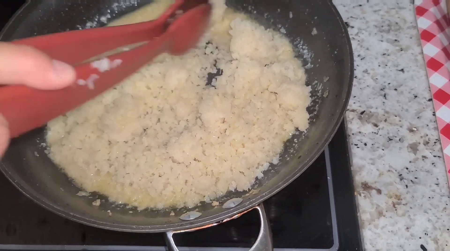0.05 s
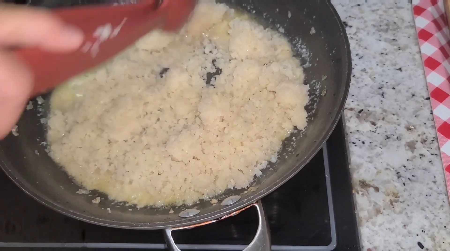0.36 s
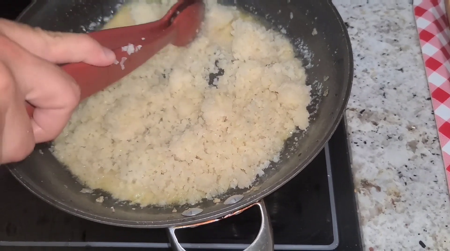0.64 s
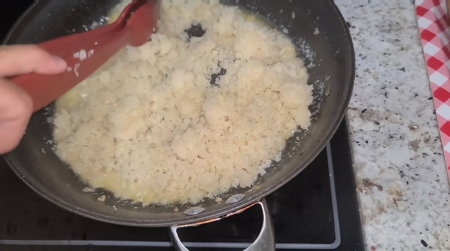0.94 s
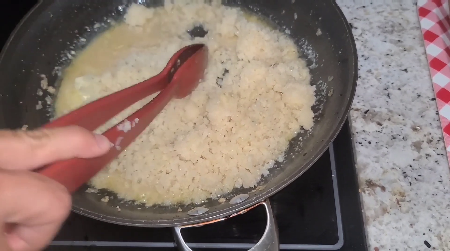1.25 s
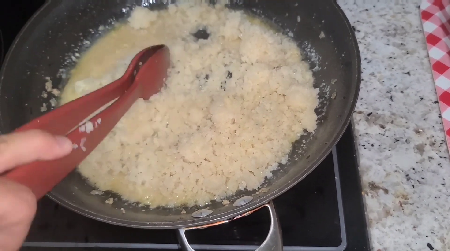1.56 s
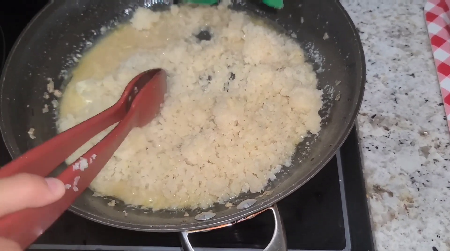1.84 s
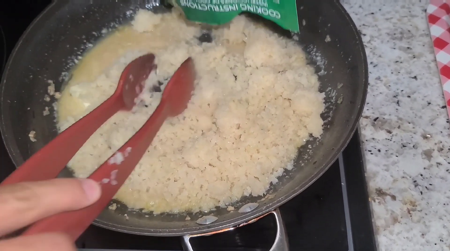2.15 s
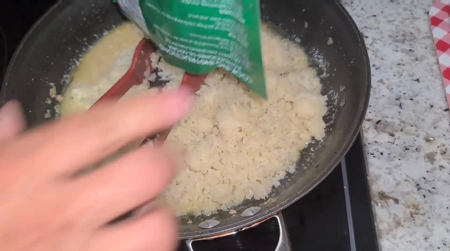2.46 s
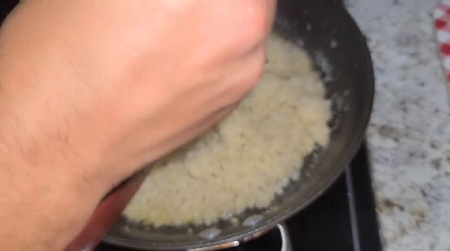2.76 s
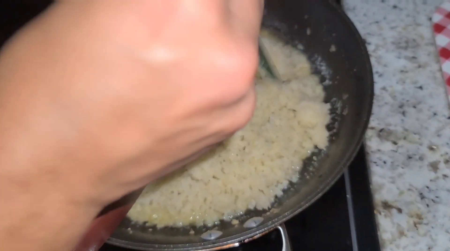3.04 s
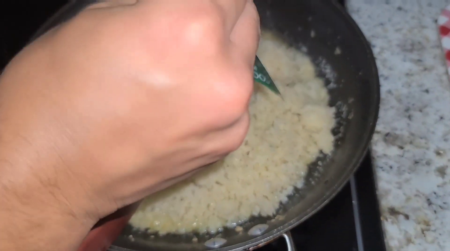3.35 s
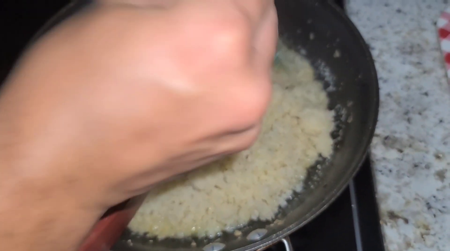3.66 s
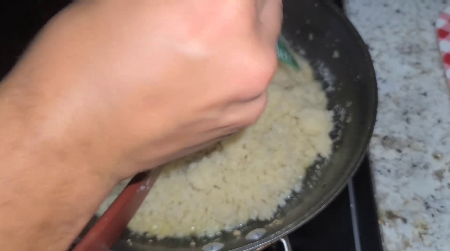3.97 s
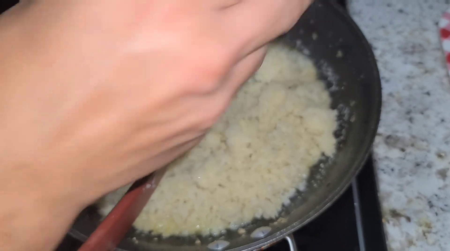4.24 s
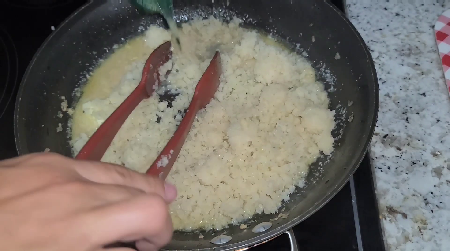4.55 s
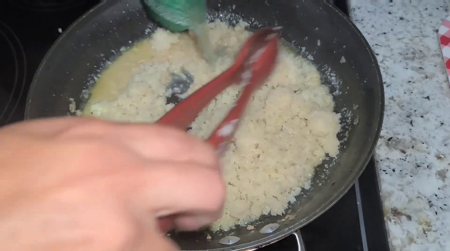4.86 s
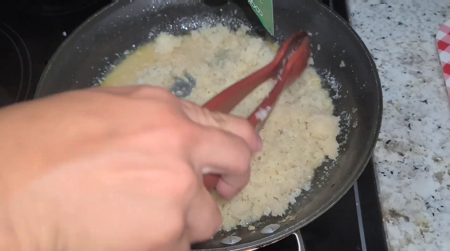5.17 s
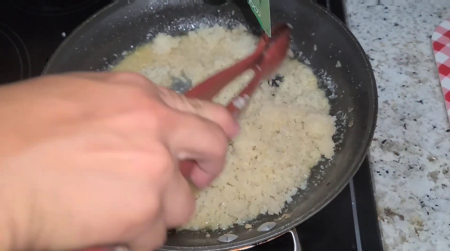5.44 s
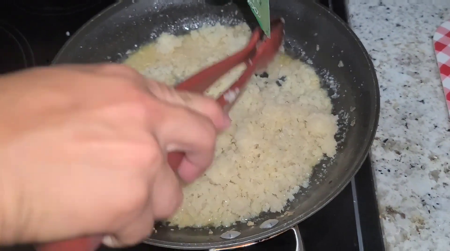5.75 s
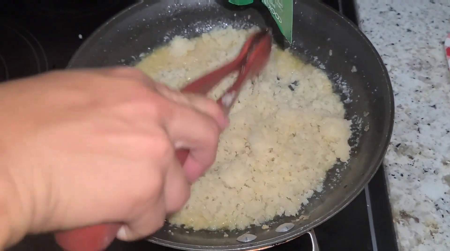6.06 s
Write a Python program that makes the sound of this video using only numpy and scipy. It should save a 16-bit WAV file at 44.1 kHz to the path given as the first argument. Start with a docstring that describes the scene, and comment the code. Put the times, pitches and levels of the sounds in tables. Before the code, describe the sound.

In a small kitchen, a close microphone catches several firm clacks and short metallic scrapes of tongs stirring rice in a frying pan. After lighter ticks comes a quick, muffled double knock on the pan. A shaken plastic pouch then crackles for about a second and a half before the tongs resume more gently. A low hum runs throughout, with a barely audible sizzle swelling now and then.

```python
"""You hear tongs scraping and clacking as they work rice in a nonstick pan on a kitchen hob.
Each squeeze rubs the steel arms together, and the firm ones end with the tips clacking shut.
The tongs knock the pan twice, then a plastic pouch crinkles as more rice is shaken out.
A faint, fizzing hiss swells now and then, and steam gives one thin whistle.
A small room echoes around it all, over a low hum."""
import sys
import numpy as np
from scipy import signal
from scipy.fft import rfft, irfft
from scipy.io import wavfile
from scipy.ndimage import uniform_filter1d

SR = 44100
rng = np.random.default_rng(int(sys.argv[2]) if len(sys.argv) > 2 else 0)


def unload_audio(sound):
    """Save the sound as a 16-bit wav file, at the path given as the first command line argument."""
    columns = np.transpose(np.atleast_2d(sound))
    # keep every value between -1 and 1, then stretch to whole-number steps
    steps = np.round(np.clip(columns, -1, 1) * 32767)
    wavfile.write(sys.argv[1], SR, steps.astype(np.int16))


N = 269451
LEAD = 4410  # extra samples before time zero, so the sound is already under way
TIME = np.arange(-LEAD, N) / SR  # seconds along the whole scene
AGE = np.arange(SR // 2) / SR  # seconds since one short sound began

# The tips meeting. Each row: start in seconds, level in dB, pitch factor,
# crack in dB compared with the tips' ring, pan thump in dB.
CLACKS = [(-.03, -16, 0.81, 3.5, -37), (0.2606, -8, 0.98, -8.5, -30.5), (.634, -7.5, 1.14, -3.5, -26),
          (0.6374, -8.5, 0.97, -1, -49), (1.0261, -4, 1.06, -17, -33), (1.186, -37, 1.3, -9, -63),
          (1.218, -38, 1.67, -6, -52), (1.82, -34.5, 1.09, -30, -55), (2.237, -33.5, 1, -7, -44),
          (4.459, -30.5, 0.96, -37, -43.5), (4.73, -37.5, 1.02, -2.5, -47), (5.351, -22.5, 1.06, -10, -35),
          (5.6668, -13.5, 1.09, -11.5, -34), (5.982, -27.5, 0.93, 2.5, -42)]
# The tones of the tips. Each row: pitch in Hz, level in dB, seconds to fade by 60 dB.
TIP_MODES = [(680, -11, 0.04), (860, -8, 0.015), (1132, 0.5, 0.022), (1634, 2, 0.017), (2490, -5.5, 0.0087),
             (2863, -9, 0.0092), (4720, -16.5, 0.01)]
# The tone colours of a clack's crack, its rattle, and the shudder of pan and hob.
# Each row: frequency in Hz, level in dB.
CRACK_COLOUR = [(200, -6), (1000, 3.5), (4000, -0.5), (7000, -10), (12000, -18.5), (16000, -36)]
RATTLE_COLOUR = [(200, -19.5), (750, -1), (1800, 8), (3200, 1), (6000, -28), (16000, -41)]
SHUDDER_COLOUR = [(30, -15), (90, 6.5), (200, -9), (400, -7.5), (600, -13), (1200, -18), (5000, -53.5)]
# Squeezes of the tongs. Each row: start in seconds, length in seconds, level at full grip in dB,
# swell up to that level in dB, arm ring in dB compared with the rubbing, arm pitch factor.
SQUEEZES = [(0.226, 0.024, -43, 16.5, -8.5, 1.14), (0.557, 0.081, -35.5, 18.5, -3, 0.97),
            (0.9812, 0.055, -52.5, -1.5, 2.5, 1.02), (1.288, 0.043, -41.5, 9, -10, 1.15),
            (1.6, 0.033, -44.5, 3.5, -7.5, 0.99), (1.871, 0.028, -44, 3, -0.5, 0.96),
            (2.075, 0.028, -48, 0, -9, 1), (5.048, 0.059, -51, 5.5, -8, 1.3),
            (5.303, 0.043, -35.5, 21.5, -18, 1.25), (5.601, 0.065, -37, 25, -9.5, 1.1),
            (5.921, 0.056, -40.5, 17.5, -1.5, 1.08)]
# The tone colour of steel rubbing on steel. Each row: frequency in Hz, level in dB.
RUB_COLOUR = [(400, -44), (1200, 1), (2500, 0), (4500, 5.5), (6000, -2.5), (9000, 3.5), (10500, -2.5),
              (13000, 0), (16000, -17)]
# The tones of the steel arms. Each row: pitch in Hz, level in dB, seconds to fade by 60 dB.
ARM_MODES = [(2510, 2, 0.034), (2816, 1.5, 0.011), (3450, -9, 0.008), (4720, -5.5, 0.019)]
# The tongs hitting the pan. Each row: start in seconds, peak in dB, contact time in seconds.
KNOCKS = [(2.3373, -15, 0.00048), (2.3796, -13, 0.00032)]
# The tones of the pan. Each row: pitch in Hz, level in dB, seconds to fade by 60 dB.
PAN_MODES = [(95, -12, 0.13), (155, -10, 0.13), (218.5, -15, 0.126), (292, -17, 0.067), (512, -5.5, 0.069),
             (731, -8.5, 0.079), (1045, -6, 0.04), (1450, -8.5, 0.073), (1562, -9.5, 0.043),
             (2010, -27.5, 0.28), (2670, -35.5, 0.51), (8270, -27, 0.074)]
# Bends of the pouch. Each row: start in seconds, hold in seconds, level in dB.
FLEXES = [(2.758, 0.019, -29), (2.8, 0.026, -37), (2.865, 0.049, -49), (3.1, 0.057, -45),
          (3.215, 0.0065, -33.5), (3.25, 0.077, -48), (3.313, 0.11, -34), (3.532, 0.042, -34),
          (3.588, 0.059, -36.5), (3.652, 0.16, -31.5), (3.83, 0.085, -33.5), (3.991, 0.0084, -32),
          (4.037, 0.069, -38.5), (4.13, 0.011, -36.5), (4.197, 0.016, -40), (4.66, 0.058, -52.5)]
# Big creases buckling. Each row: start in seconds, peak in dB, sharp edge in dB compared with the body.
SNAPS = [(2.763, -26.5, -0.5), (2.7933, -22, 10), (2.7979, -21, 6), (2.8476, -18.5, -11.5),
         (2.876, -28, -15), (3.016, -29, 6), (3.05, -28, -11), (3.1048, -19.5, -6), (3.378, -9, 6.5),
         (3.404, -22, -3), (3.481, -22, -27), (3.511, -24, -22), (3.59, -31.5, 3), (3.634, -20.5, -10),
         (3.6443, -19.5, 3.5), (3.678, -27, -3), (3.7229, -8, -26), (3.7277, -17, 0), (3.741, -19, -20),
         (3.772, -24, 2.5), (3.8085, -11.5, -42), (3.8119, -17.5, -8.5), (3.829, -22, -12),
         (3.848, -17, 7.5), (3.874, -18.5, -8), (3.892, -17.5, -8.5), (3.967, -28, -21),
         (4.004, -24.5, -15), (4.099, -25, -21), (4.133, -31, -23), (4.249, -31, -20), (4.261, -30.5, -12),
         (4.5256, -31.5, 3)]
# The tone colours of the pouch's body and a crease's sharp edge. Each row: frequency in Hz, level in dB.
POUCH_COLOUR = [(60, -14), (150, -11), (300, -3.5), (450, -7), (640, 4.5), (900, -1.5), (1300, 4.5),
                (1650, 2), (2200, -8), (3200, -10), (4500, -26.5), (6200, -47.5), (9000, -75), (16000, -52)]
EDGE_COLOUR = [(500, -2), (1500, 7.5), (3000, 13.5), (4600, 4), (6200, -7.5), (8800, -8.5), (11000, -21),
               (16000, -35.5)]
# Swells of a faint, fizzing hiss. Each row: start in seconds, hold in seconds, level in dB.
HISS_SWELLS = [(1.02, 0.4, -62), (1.66, .06, -72), (2.22, 0.014, -63), (4.15, 0.22, -63)]
# The resonances of the hiss. Each row: centre in Hz, width in octaves, level in dB.
FIZZ_BANDS = [(1380, 2, 0), (3340, 0.82, -6.5), (4650, 0.16, -3.5), (8750, 0.26, -9), (13000, 0.34, -14)]
# Steam escaping from the rice. Each row: start in seconds, hold in seconds, level in dB.
WHISTLES = [(1.245, 0.028, -52)]
# The tone colour of rumble, for both kitchen and shaken pouch. Each row: frequency in Hz, level in dB.
RUMBLE_COLOUR = [(25, -7), (60, -0.5), (130, -5.5), (250, -9), (500, -18), (1000, -27.5), (2500, -38.5),
                 (4800, -45.5), (6200, -57), (9000, -56), (16000, -54)]
# The rise and fall of the hum. Each row: time in seconds, level in dB.
HUM_LEVELS = [(0, -70), (1, -58), (2.5, -49.5), (4.5, -61.5), (6.1, -64)]
# The room's echo. Each row: frequency in Hz, level in dB, seconds to fade by 60 dB.
ROOM_BANDS = [(119.2, -6.5, 0.44), (500, -7, 0.33), (1200, -15.5, 0.33), (2610, -12, 0.45),
              (4930, -13.5, 0.22), (8820, -17.5, 0.62), (14040, -22, 0.26)]

THUMP_LEFT_HZ, THUMP_RIGHT_HZ = 86.2, 166  # the pan rocks at a different pitch on either side
CROSS_S = 4.9  # the tongs move over to the right side
THUMP_CYCLES = 38  # swings of the rocking pan until it is 60 dB down
SWELL_POWER = 2.1  # the grip tightens slowly at first, then fast
PITCH_RISE = 0.05  # the arms stiffen and ring higher as the grip tightens
CATCH_DB, CATCH_S = 6, 0.0052  # the arms break loose with a brief rasp, stronger if they ring freely


def clacks(rattle_db=-19, rattle_t60=0.16, shudder_db=2, shudder_t60=0.1, mode_scatter=0.025):
    """The padded tips shut with a dead clack, rattle briefly and rock the pan on the hob."""
    out = np.zeros(len(TIME))
    for start, db, pitch, crack_db, thump_db in CLACKS:
        # the grip and the rice between the tips shift each tone a little
        shifts = pitch * (1 + mode_scatter * rng.standard_normal(len(TIP_MODES)))
        modes = [(hz * shift, mode_db, t60) for (hz, mode_db, t60), shift in zip(TIP_MODES, shifts)]
        tips = peak_one(ring(modes))
        crack = undb(crack_db) * peak_one(colour(burst(t60=0.021), CRACK_COLOUR))
        rattle = undb(rattle_db) * peak_one(colour(burst(rattle_t60), RATTLE_COLOUR))
        thump_hz = THUMP_LEFT_HZ if start < CROSS_S else THUMP_RIGHT_HZ
        rocking = ring([(thump_hz, -3, THUMP_CYCLES / thump_hz)])
        shudder = undb(shudder_db) * peak_one(colour(burst(shudder_t60), SHUDDER_COLOUR))
        clack = undb(db) * (tips + crack + rattle) + undb(thump_db) * (rocking + shudder)
        add(out, start, echo(clack, wet_db=1.5))
    return out


def scrapes(attack_share=0.33, release_s=0.006, chatter_db=2.0, pitch_wander=0.03):
    """Steel slides on steel: the arms catch, then tiny slips hiss and make them ring."""
    out = np.zeros(len(TIME))
    rubbing = grains(rate=6000, spread_db=1.0) * undb(chatter_db * drift(rate=350))
    contact_point = drift(rate=70)
    for start, length, final_db, swell_db, ring_db, pitch in SQUEEZES:
        slips = np.roll(rubbing, -int(start * SR))[:len(AGE)]
        wander = np.roll(contact_point, -int(start * SR))[:len(AGE)]
        grip = np.minimum(AGE / length, 1) ** SWELL_POWER
        arms = through(slips, ring([(hz * pitch, db, t60) for hz, db, t60 in ARM_MODES]))
        speed = 1 + PITCH_RISE * grip + pitch_wander * wander  # a faster ring sounds higher
        arms = np.interp(np.cumsum(speed) / SR, AGE, arms, right=0)
        catch = undb(CATCH_DB + ring_db) * np.exp(-AGE / CATCH_S)
        rasp = unit(colour(slips, RUB_COLOUR)) + undb(ring_db) * (1 + catch) * unit(arms)
        pressure = undb(final_db - swell_db * (1 - grip))
        fade_in = np.minimum(AGE / (attack_share * length), 1)
        fade_out = np.exp(-np.maximum(AGE - length, 0) / release_s)
        add(out, start, echo(pressure * (fade_in * fade_out + catch) * rasp, wet_db=2.5))
    return out


def knocks(tips_db=-5):
    """The tongs bounce on the pan, whose ring is muffled by the food; a longer contact is duller."""
    out = np.zeros(len(TIME))
    for start, db, contact_s in KNOCKS:
        pan = peak_one(ring(PAN_MODES))
        tips = undb(tips_db) * peak_one(through(burst(t60=0.052), ring(TIP_MODES)))
        knock = through(pan + tips, fade(contact_s))
        add(out, start, undb(db) * peak_one(knock))
    return out


def pouch_rustle(body_db=-2.0, edge_db=-17.0, handling_db=-12.5, clump_db=5, tick_db=-4):
    """Small creases crackle and tick, brighter when folded hard, while the shaken pouch rumbles."""
    flex = gestures(FLEXES, attack_s=0.007, release_s=0.026)
    creases = unit(crackle(rate=300, spread_db=1.0))
    ticks = undb(tick_db) * unit(grains(rate=200, spread_db=0.5))
    clumps = (creases + ticks) * undb(clump_db * np.tanh(drift(rate=170)))
    body = undb(body_db) * unit(colour(clumps, POUCH_COLOUR))
    edge = undb(edge_db) * np.sqrt(peak_one(flex)) * unit(colour(clumps, EDGE_COLOUR))
    handling = undb(handling_db) * unit(colour(rng.standard_normal(len(TIME)), RUMBLE_COLOUR))
    return echo(flex * (body + edge + handling), wet_db=3.5)


def pouch_snaps(attack_s=0.00071, decay_s=0.0026, size_scatter=0.14):
    """Big creases give way within a few milliseconds, each snapping at its own pitch."""
    out = np.zeros(len(TIME))
    shape = (1 - np.exp(-AGE / attack_s)) * np.exp(-AGE / decay_s)
    for start, db, edge_db in SNAPS:
        buckle = rng.standard_normal(len(AGE)) * shape
        pitch = np.exp(size_scatter * rng.standard_normal())
        body = peak_one(colour(buckle, [(hz * pitch, band_db) for hz, band_db in POUCH_COLOUR]))
        edge = undb(edge_db) * peak_one(colour(buckle, EDGE_COLOUR))
        add(out, start, echo(undb(db) * peak_one(body + edge), wet_db=2.6))
    return out


def hiss(rest_db=-77, pop_db=-8, sputter_db=2.2):
    """Tiny clicks blur into a faint, fizzing hiss with lone pops; it swells now and then."""
    pops = undb(pop_db) * unit(grains(rate=22, spread_db=3.0))
    fizz = 0
    for hz, octaves, db in FIZZ_BANDS:
        sputter = unit(grains(rate=2500, spread_db=2.8)) * undb(sputter_db * drift(rate=40))
        fizz = fizz + undb(db) * band(sputter + pops, hz, octaves, order=2)
    swells = gestures(HISS_SWELLS, attack_s=0.084, release_s=0.44)
    return (undb(rest_db) + swells) * unit(fizz)


def whistle():
    """Steam squeezes through a narrow gap in the rice and sings at one breathy pitch."""
    return gestures(WHISTLES, attack_s=0.014, release_s=0.12) * wavering_tone(hz=2164, t60=0.012)


def kitchen(rumble_db=-49.5):
    """A steady low rumble with a wavering hum in it."""
    rumble = unit(colour(rng.standard_normal(len(TIME)), RUMBLE_COLOUR))
    hum_db = np.interp(TIME, *np.transpose(HUM_LEVELS))
    return undb(rumble_db) * rumble + undb(hum_db) * wavering_tone(hz=93, t60=0.33)


def echo(x, wet_db, build_s=0.0024):
    """A sound plus its echo off the hard walls of a small room, different for every spot."""
    log_hz = np.log(np.maximum(np.arange(len(AGE) // 2 + 1) * SR / len(AGE), 1))
    centres = np.log(np.array(ROOM_BANDS)[:, 0])
    spectrum = rfft(rng.standard_normal(len(AGE)))
    tail = 0
    for weights, (_, db, t60) in zip(np.eye(len(ROOM_BANDS)), ROOM_BANDS):
        band_noise = irfft(spectrum * np.interp(log_hz, centres, weights), len(AGE))
        shape = fade(t60) * (1 - np.exp(-AGE / build_s))
        tail = tail + undb(db) * band_noise * shape / np.linalg.norm(shape)
    return x + undb(wet_db) * through(x, tail)


def ring(modes):
    """The fading tones of a struck object; neighbours swing in opposite directions."""
    return sum((-1) ** k * undb(db) * fade(t60) * np.sin(2 * np.pi * hz * AGE)
               for k, (hz, db, t60) in enumerate(modes))


def wavering_tone(hz, t60):
    """Noise keeps one resonance ringing unevenly."""
    return unit(through(rng.standard_normal(len(TIME)), fade(t60) * np.sin(2 * np.pi * hz * AGE)))


def burst(t60):
    """A dying puff of noise."""
    return rng.standard_normal(len(AGE)) * fade(t60)


def grains(rate, spread_db):
    """Tiny random clicks, about `rate` a second, most of them weak and a few strong."""
    count = len(TIME)
    sizes = undb(spread_db * np.minimum(rng.exponential(size=count), 4))
    return (rng.random(count) < rate / SR) * sizes * rng.choice([-1, 1], count)


def crackle(rate, spread_db):
    """Clicks at many pitches, each ringing for a few cycles."""
    return sum(band(unit(grains(rate, spread_db)), hz, octaves=0.5, order=1)
               for hz in np.geomspace(110, 14000, 15))


def drift(rate):
    """A smooth random wander; a higher rate moves faster."""
    size = int(SR / rate)
    return unit(uniform_filter1d(uniform_filter1d(rng.standard_normal(len(TIME)), size), size))


def gestures(rows, attack_s, release_s):
    """Loudness over time for a list of swells: each builds up, holds and dies away."""
    loudness = 0
    for start, hold_s, db in rows:
        rise = np.clip((TIME - start) / attack_s, 0, 1)
        fall = np.exp(-np.maximum(TIME - start - hold_s, 0) / release_s)
        loudness = loudness + undb(db) * rise * fall
    return loudness


def colour(x, points, size=4096):
    """Make a sound's frequencies louder or softer, following a tone colour table."""
    hz, db = np.transpose(points)
    bins = np.maximum(np.arange(size // 2 + 1) * SR / size, 1)
    gains = undb(np.interp(np.log(bins), np.log(hz), db))
    # folding the cepstrum keeps the filter from sounding before its input does
    cepstrum = irfft(np.log(gains))
    cepstrum[1:size // 2] *= 2
    cepstrum[size // 2 + 1:] = 0
    return through(x, irfft(np.exp(rfft(cepstrum))))


def band(x, hz, octaves, order):
    """Keep the frequencies around hz."""
    ratio = 2 ** (octaves / 2)
    return signal.lfilter(*signal.butter(order, [hz / ratio, hz * ratio], "band", fs=SR), x)


def through(x, response):
    """Let every sample of a sound set off a copy of the response."""
    return signal.fftconvolve(x, response)[:len(x)]


def fade(t60):
    """A fade that loses 60 dB in t60 seconds."""
    return np.exp(-np.log(1000) * AGE / t60)


def undb(db):
    """Turn decibels into a multiplier."""
    return 10 ** (np.asarray(db) / 20)


def unit(x):
    """Scale to an average (rms) level of 1."""
    return x / np.sqrt(np.mean(x ** 2))


def peak_one(x):
    """Scale to a peak of 1."""
    return x / np.abs(x).max()


def add(track, start_s, sound):
    """Mix a sound into a track at the given time."""
    start = max(int(start_s * SR) + LEAD, 0)
    part = sound[:len(track) - start]
    track[start:start + len(part)] += part


def scene():
    """Tongs, pouch, hiss, whistle and background, mixed into one channel."""
    tongs = clacks() + scrapes() + echo(knocks(), wet_db=3.5)
    pouch = pouch_rustle() + pouch_snaps()
    faint_sounds = echo(hiss() + whistle(), wet_db=2.5)
    return (tongs + pouch + faint_sounds + kitchen())[None, LEAD:]


def record(dry, top_hz=16000):
    """A nearby phone picks up the sound and cuts the highest treble."""
    return signal.sosfilt(signal.ellip(8, .2, 70, top_hz, fs=SR, output="sos"), dry)


dry = scene()
out = record(dry)
unload_audio(out)
```